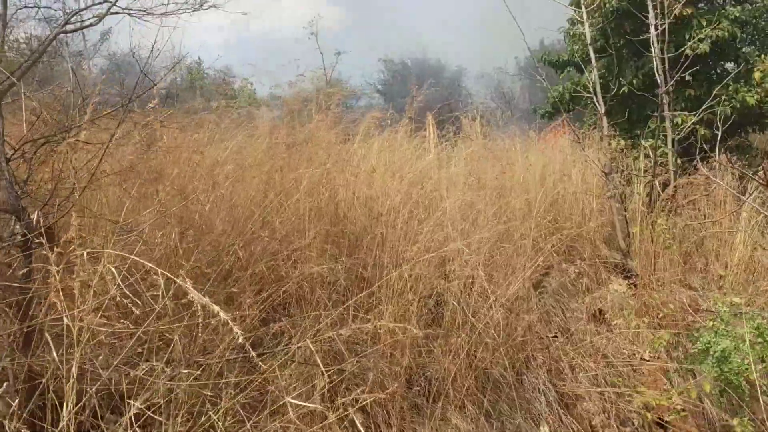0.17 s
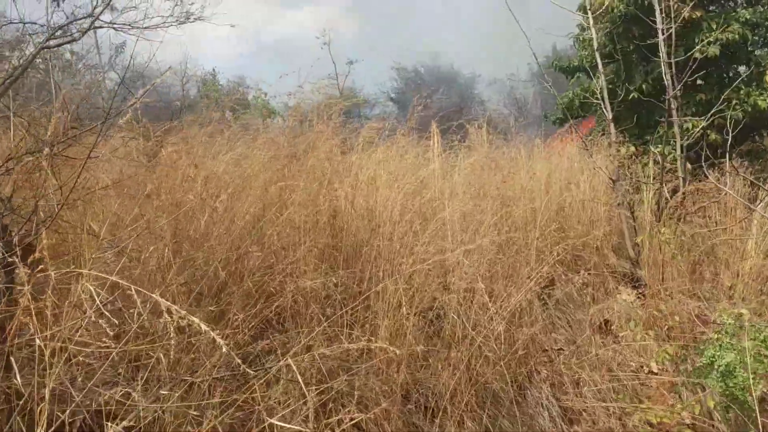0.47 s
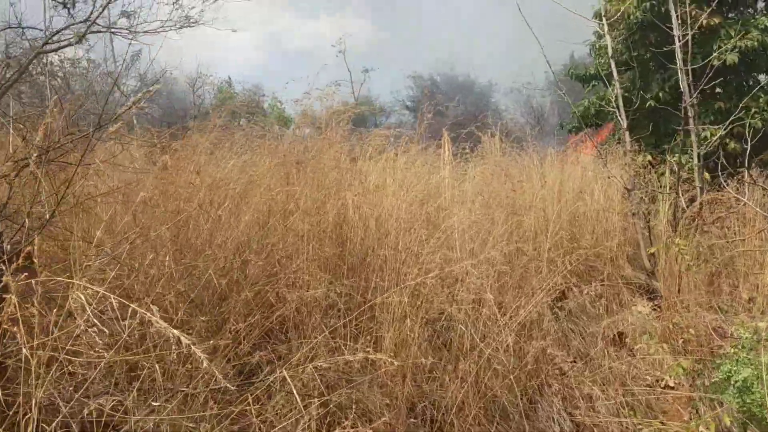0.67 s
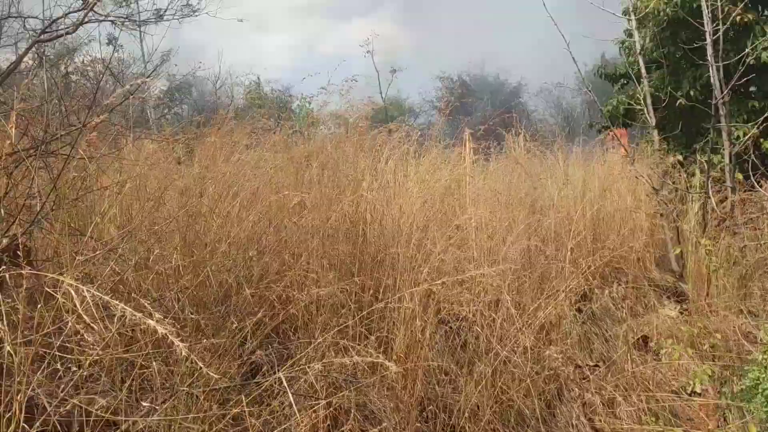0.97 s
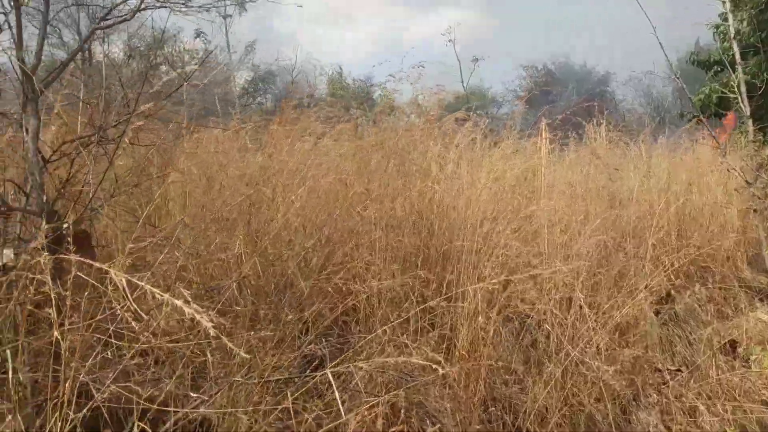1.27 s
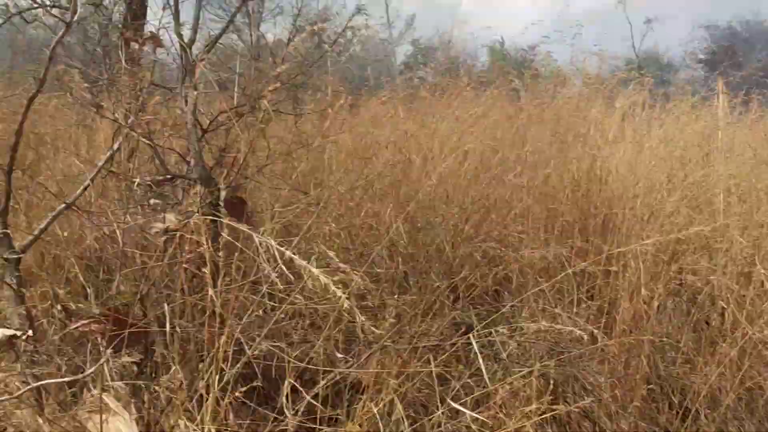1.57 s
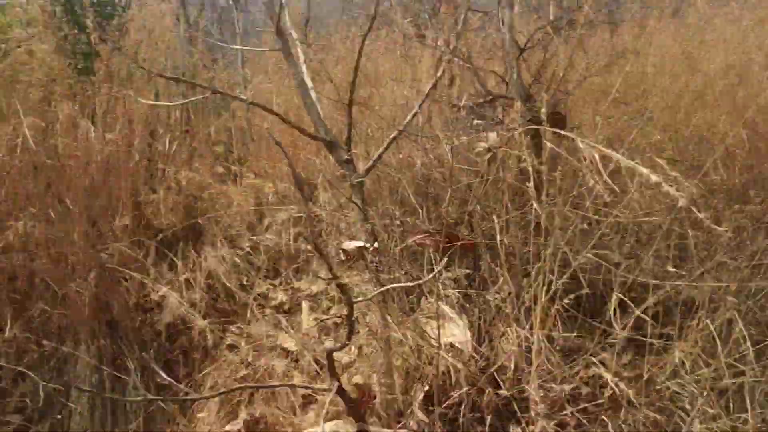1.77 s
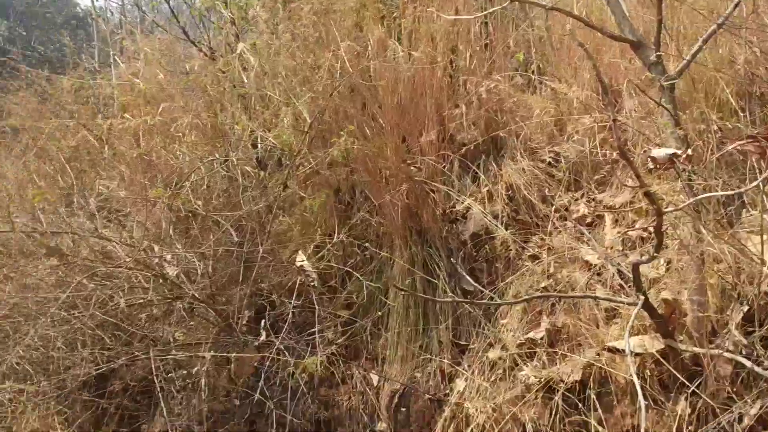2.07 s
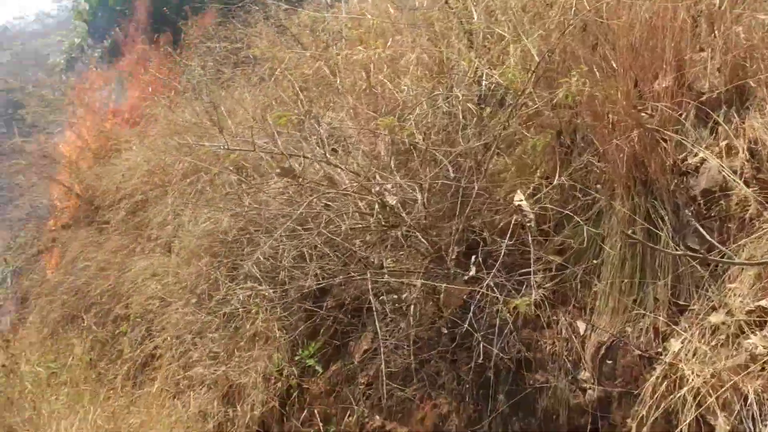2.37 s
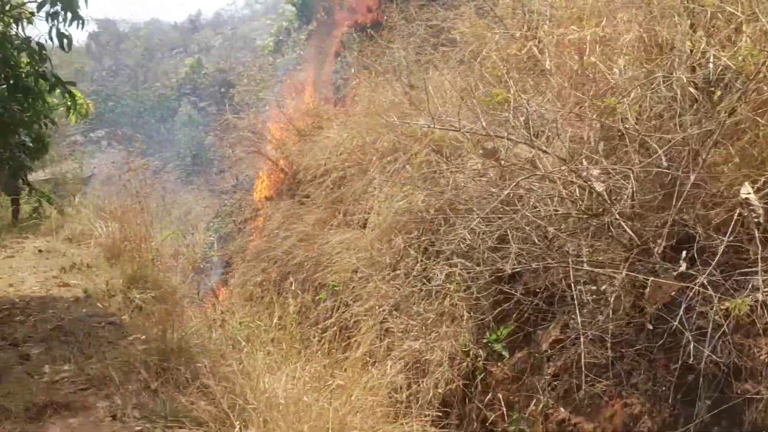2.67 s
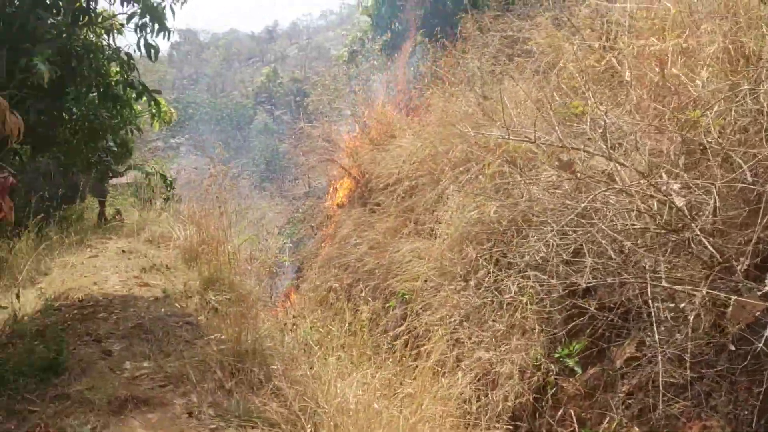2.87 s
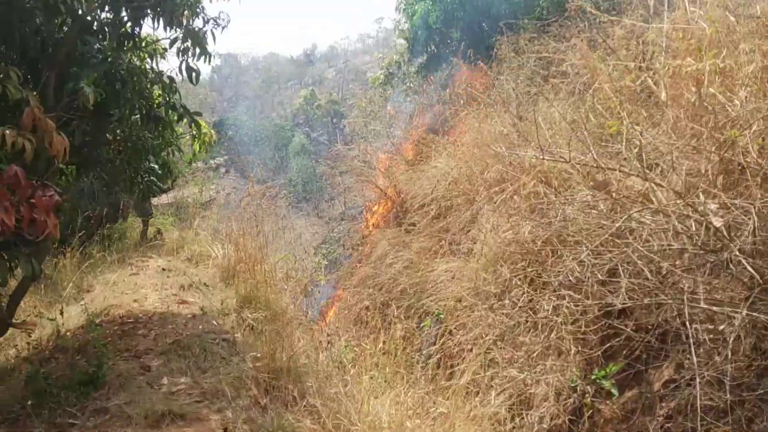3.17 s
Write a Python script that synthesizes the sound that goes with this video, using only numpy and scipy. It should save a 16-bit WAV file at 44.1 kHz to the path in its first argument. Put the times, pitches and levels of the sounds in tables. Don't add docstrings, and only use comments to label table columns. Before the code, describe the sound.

A grass fire on open land crackles continuously from start to finish, bright dry snaps crowding over a hissing, rushing bed. Wind thumps the left at 0.1-0.25 and 0.8-1.0 seconds. Snapping is busiest until 1.4; a gust slaps the right near 1.7 as the handheld stereo microphone turns. Heavy right-side buffeting comes at 2.3-2.5, the fire centres by 2.8, and duller pops and snaps continue to 3.3.

```python
import sys
import numpy as np
from scipy import signal
from scipy.fft import rfft, irfft
from scipy.io import wavfile
from scipy.ndimage import uniform_filter1d, minimum_filter1d

SR = 44100
rng = np.random.default_rng(int(sys.argv[2]) if len(sys.argv) > 2 else 0)


def field_ratio(decibels):
    return 10 ** (np.asarray(decibels, dtype=float) / 20)


def transcribe(signal):
    frames = np.atleast_2d(signal).T
    limited = np.clip(frames, -1, 1)
    pcm = np.round(limited * 32767).astype(np.int16)
    wavfile.write(sys.argv[1], SR, pcm)


N = 146853

# t/s, level/dB
BLAZE = [(0, -33), (.2, -32), (.26, -26), (.31, -30.5), (.5, -27.5), (.63, -31), (.8, -27), (.97, -29),
         (1.2, -25), (1.35, -29.5), (1.45, -27), (1.6, -30), (1.74, -28.5), (1.97, -28.5), (2.4, -29.5),
         (2.55, -29.5), (3.0, -29), (3.17, -26)]
# f/Hz, level/dB
FIRE_SPECTRUM = [(200, -3), (500, -4), (1700, -3.5), (3100, -2.5), (4400, 0), (7500, -0.5), (12000, 0.5),
                 (15500, -4)]
# t/s, left lag/ms, casing echo delay/ms, echo share left/1, echo share right/1,
# share of the path round the casing/1
TURN = [
    (0, .42, .19, .55, .03, .1),
    (.9, .435, .19, .4, .05, 0),
    (1.1, .46, .185, .33, .03, 0),
    (1.7, .465, .2, .3, .03, 0),
    (2.0, .32, .36, .35, .05, .35),
    (2.35, .175, .34, .35, .08, .55),
    (2.5, .14, .33, .3, .08, 0),
    (2.8, 0, .32, .3, .1, 0),
    (3.33, 0, .33, .4, .1, 0),
]
# t/s, peak
# level/dB, f/Hz, length/ms
LOUD_SNAPS = [(0.2091, -7.0, 12100.0, 0.45), (0.2924, -12.0, 6800.0, 0.45), (0.3146, -10.0, 6500.0, 1.35),
              (0.3483, -10.0, 11600.0, 0.45), (0.44, -8.0, 7200.0, 1.15), (0.483, -9.0, 9000.0, 0.85),
              (0.5553, -12.0, 7400.0, 0.95), (0.6616, -8.0, 7300.0, 0.45), (0.6658, -11.0, 6600.0, 0.35),
              (0.7467, -11.0, 2200.0, 0.55), (0.8023, -9.0, 2800.0, 0.65), (0.8445, -8.0, 2800.0, 0.85),
              (0.8993, -12.0, 7900.0, 2.15), (0.9291, -10.0, 6700.0, 0.85), (0.9976, -11.0, 2100.0, 0.65),
              (1.0353, -10.0, 1800.0, 0.35), (1.0579, -9.0, 8100.0, 0.55), (1.0769, -10.0, 2900.0, 0.75),
              (1.1625, -9.0, 8400.0, 0.25), (1.177, -12.0, 3400.0, 0.45), (1.1927, -12.0, 8300.0, 0.35),
              (1.2134, -10.0, 1600.0, 0.75), (1.23, -12.0, 7900.0, 0.75), (1.3124, -11.0, 8200.0, 0.35),
              (1.4117, -11.0, 2700.0, 0.55),
              (1.7116, -10.0, 2600.0, 0.35), (1.7366, -11.0, 9200.0, 1.05), (1.7917, -13.0, 10200.0, 0.55),
               (2.0315, -12.0, 11400.0, 0.55), (2.0937, -8.0, 10700.0, 0.65), (2.204, -14.0, 7500.0, 1.75),
               (2.2079, -9.0, 10300.0, 0.65), (2.2217, -10.0, 7700.0, 0.75), (2.3852, -11.0, 9900.0, 1.05),
               (2.4117, -13.5, 6600.0, 1.25), (2.4216, -9.0, 10200.0, 1.25), (2.4532, -11.0, 7700.0, 0.45),
               (2.4686, -9.0, 7400.0, 0.55), (2.5517, -12.0, 13600.0, 0.55), (2.5765, -13.0, 11100.0, 0.45),
               (2.6546, -9.0, 10300.0, 0.45), (2.7241, -13.0, 10200.0, 0.75),
               (2.8126, -11.0, 10900.0, 0.65), (2.9325, -10.0, 8400.0, 0.55), (2.9711, -10.0, 4100.0, 0.45),
               (3.1315, -9.0, 8700.0, 0.35), (3.1888, -10.0, 10900.0, 0.45), (3.1973, -12.0, 1700.0, 0.75),
               (3.2029, -10.0, 4000.0, 0.55), (3.2368, -9.0, 10600.0, 1.95)]
# t/s, peak level/dB, f/Hz
TICKS = [(0.06, -19, 2800), (0.0657, -20, 7600), (0.098, -17, 6500), (0.1845, -19, 2300),
         (0.2091, -9, 12100), (0.2215, -16, 7300), (0.2356, -17, 9300), (0.2661, -16, 7000),
         (0.4782, -18, 7100), (0.5708, -19, 8100), (0.5883, -17, 6500), (0.5968, -18, 6500),
         (0.6857, -18, 6700), (0.6891, -19, 11500), (0.723, -19, 6700), (0.7353, -17, 2900),
         (0.7624, -18, 5700), (0.8069, -15, 7700), (0.8322, -18, 11300), (0.8575, -17, 15200),
         (0.8672, -17, 15200), (0.9036, -18, 9300), (0.9106, -18, 11700), (1.0514, -18, 1700),
         (1.0835, -15, 6700), (1.1578, -17, 8800), (1.1733, -15, 7100), (1.2006, -15, 8500),
         (1.2184, -16, 7300), (1.227, -16, 13400), (1.2823, -16, 12300), (1.2901, -16, 9600),
         (1.3426, -19, 8300), (1.3495, -19, 9700), (1.4542, -14, 6400), (1.4875, -16, 1700),
         (1.5725, -17, 7100), (1.5822, -16, 9300), (1.609, -18, 2600), (1.6332, -16, 1400),
         (1.6543, -18, 1700), (1.6702, -17, 12800), (1.7178, -17, 5300), (1.7309, -18, 10200),
         (1.8604, -20, 10800), (1.9059, -17, 10300), (2.0972, -18, 6800), (2.3079, -18, 10900),
         (2.3498, -19, 4300), (2.5415, -19, 9800), (2.6179, -19, 10900), (2.7165, -19, 10000),
         (2.8235, -17, 11200), (2.8483, -18, 8100), (3.1175, -18, 1700), (3.3054, -17, 10200)]
# t/s, peak level/dB, f/Hz
POPS = [
    (0.4264, -11, 1200),
    (0.4733, -14, 1460),
    (2.365, -17.5, 795),
    (2.912, -25, 1990),
    (2.9393, -20, 1700),
    (2.959, -17.5, 1700),
    (2.9714, -15, 1120),
    (3.161, -22, 1840),
    (3.314, -13, 655),
]
# t/s, left level/dB, right level/dB
BREEZE = [(0, -21.5, -29), (.3, -29, -45), (.75, -29.5, -30), (1.05, -25, -35.5), (1.35, -30.5, -30),
          (1.7, -37, -24.5), (1.9, -32.5, -31.5), (2.15, -32, -32), (2.3, -20.5, -23), (2.6, -24, -25),
          (2.8, -47.5, -24.5), (3.05, -30.5, -27), (3.33, -35.5, -37.5)]
# f/Hz, level per Hz/dB
WIND_SPECTRUM = [(15, -2.5), (40, 4.5), (70, -3), (130, -7.5), (250, -20.5), (500, -47.5), (1000, -26)]
# t/s, peak level/dB, width/ms
EDDIES_LEFT = [(0.065, -12, 11.5), (0.078, -12, 11), (0.098, -15.5, 3.3), (0.12, -12.5, 9.7),
               (0.139, -7.5, 2.6), (0.162, -3.5, 2.93), (0.185, -10.5, 14), (0.208, -11, 5),
               (0.232, -13.5, 2.9), (0.253, -3.5, 5.2), (0.826, -15.5, 6.6), (0.881, -7, 4.5),
               (0.9, -5, 4.4), (0.933, -3.5, 6.6), (0.967, -9, 4.8), (2.332, -13, 2.4), (2.351, -30, 5.5),
               (2.421, -15, 1.57)]
# t/s, peak level/dB, width/ms
EDDIES_RIGHT = [(1.467, -10, 2.5), (1.56, -22.5, 65), (1.751, -15, 3.7), (2.301, -3.5, 9.3),
                (2.311, -3.5, 2.3), (2.334, -6, 2.2), (2.35, -4.5, 3.5), (2.445, -6.5, 7), (2.488, -6, 2.8),
                (2.502, -5, 2.2), (2.511, -8.5, 3.4), (2.542, -11, 4.4), (2.712, -16, 9.5),
                (2.767, -11.5, 7.5), (2.879, -15.5, 1.6), (2.91, -9, 5.9)]
# t/s, level/dB, recovery/ms
SLAPS = [
    (1.6763, -2.5, 4.1),
    (2.955, -8, 7.4),
]

SNAP_DB, SNAP_RING, SNAP_Q = 3.0, .35, 3.5
SNAP_TAIL_DB, SNAP_TAIL_S = -17, .008
POP_HZ, POP_RING = 3000, .65
TICK_MS, TICK_DB = .5, 2.5
CRACKLE_PER_S, CRACKLE_SPREAD_DB, CRACKLE_CAP, CRACKLE_DB = 910, 3, 3.1, 2
CLUMP_DB = 3.0
GRAIN_MS, GRAIN_SPREAD = .25, 4.0
RUSH_DB, RUSH_PATCH_DB = -1, 1.5
DIFFUSE_DB, DIFFUSE_LOW_DB, DIFFUSE_FROM_HZ, DIFFUSE_GRAIN = 8, -4.5, 4200, 0.81
ROAR_HZ, ROAR_DB, ROAR_DB_PER_MS = 1410, -5, 11
FRONT_MS, ROUND_MS = .028, .26
LUMPY_DB = 2.0
SUCK_LEFT, SUCK_RIGHT, SETTLE = 0.64, 0.085, 0.19
SLAP_RISE_MS, SLAP_EDGE_MS = 4.3, 0.73
LIMIT_DB, LIMIT_SHARE, RECOVER_DB_PER_S = -9, .7, 400
GATE_DB, GATE_DEPTH_DB, GATE_FROM_HZ = -3.3, -40, 2300
EDGE_HZ = 15800


def evened(x):
    return x / np.sqrt(np.mean(x ** 2) + 1e-20)


def read(points, hz):
    f, value = np.transpose(points)
    return np.interp(np.log(hz + 1), np.log(f + 1), value)


def curve(rows, t):
    columns = np.transpose(rows)
    return np.array([np.interp(t, columns[0], c) for c in columns[1:]])


def drift(rate, shape):
    z = rfft(rng.standard_normal(shape))
    return evened(irfft(z / (1 + (np.fft.rfftfreq(N, 1 / SR) / rate) ** 2), N))


def burst(hz, ms, noise):
    t = np.arange(len(noise)) / SR
    r = np.exp(-np.pi * hz / SNAP_Q / SR)
    hz = min(hz, 16000)
    ring = signal.lfilter([1, 0, -1], [1, -2 * r * np.cos(2 * np.pi * hz / SR), r * r], noise)
    u = t * 1000 / ms - 1
    shape = np.exp(-np.where(u < 0, 3 * u ** 2, 1.5 * u))
    shape = shape + (u > 0) * field_ratio(SNAP_TAIL_DB) * np.exp(-t / SNAP_TAIL_S)
    share = POP_RING if hz < POP_HZ else SNAP_RING
    sound = shape * ((1 - share) * noise + share * evened(ring))
    return sound / np.sqrt(uniform_filter1d(sound ** 2, size=20, mode="constant").max())


def crackle(count=6, size=5):
    clump = field_ratio(CLUMP_DB * drift(13, N))
    hit = rng.random(N) < clump / clump.mean() * CRACKLE_PER_S / SR
    big = np.minimum(rng.exponential(1, N), CRACKLE_CAP)
    train = hit * field_ratio(CRACKLE_SPREAD_DB * big)
    kind = rng.integers(0, count * size, N)
    draw = rng.random((count * size, 2))
    noise = rng.standard_normal((count * size, 1024))
    out = np.zeros((count, N))
    for k in range(count * size):
        grain = burst(900 * 15 ** draw[k, 0], GRAIN_MS * GRAIN_SPREAD ** draw[k, 1], noise[k])
        out[k % count] += signal.oaconvolve(train * (kind == k), grain)[:N]
    return out / np.sqrt(np.mean(out.sum(0) ** 2))


def ports(places, gains):
    hz, t, z = signal.stft(places, SR, nperseg=256, noverlap=192)
    lag, echo, left, right, around = curve(TURN, t)
    spread = FRONT_MS * np.linspace(-1, 1, len(places))[:, None, None]

    def late(ms):
        return np.exp(-2j * np.pi * hz[:, None] * ms / 1000)

    z = z * gains(hz, t)
    at_left = (z * late(lag + spread)).sum(0) * (1 - left * late(echo) + around * late(ROUND_MS))
    at_right = z.sum(0) * (1 - right * late(echo))
    return signal.istft(np.array([at_left, at_right]), SR, nperseg=256, noverlap=192)[1][:, :N]


def colour(hz, t):
    level = curve(BLAZE, t)[0]
    roar = ROAR_DB + ROAR_DB_PER_MS * curve(TURN, t)[0]
    return field_ratio(read(FIRE_SPECTRUM, hz)[:, None] + level + roar / (1 + (hz[:, None] / ROAR_HZ) ** 2))


def scatter_colour(hz, t):
    low = DIFFUSE_LOW_DB / (1 + (hz[:, None] / DIFFUSE_FROM_HZ) ** 4)
    return colour(hz, t) * field_ratio(DIFFUSE_DB + low)


def fire():
    places = crackle()
    rush = rng.standard_normal(places.shape) / np.sqrt(len(places))
    rush = rush * field_ratio(RUSH_PATCH_DB * drift(23, N))
    front = ports(field_ratio(CRACKLE_DB) * places + field_ratio(RUSH_DB) * rush, colour)
    grain = np.sqrt(abs(uniform_filter1d((places ** 2).sum(0), size=90)))
    scatter = rng.standard_normal((2, 1, N)) * (1 - DIFFUSE_GRAIN + DIFFUSE_GRAIN * grain)
    return front + [ports(scatter[0], scatter_colour)[0], ports(scatter[1], scatter_colour)[1]]


def snap_colour(hz, t):
    return field_ratio(read(FIRE_SPECTRUM, hz))[:, None]


def snaps(count=3):
    small = [(s, db + TICK_DB, hz, TICK_MS) for s, db, hz in TICKS + POPS]
    rows = LOUD_SNAPS + small
    noise = rng.standard_normal((len(rows), 1024))
    out = np.zeros((count, N))
    for k, (s, db, hz, ms) in enumerate(rows):
        part = out[k % count, round((s - ms / 1000) * SR):][:1024]
        part += field_ratio(db + SNAP_DB) * burst(hz, ms, noise[k])[:len(part)]
    return ports(out, snap_colour)


def wind():
    hz, t = np.fft.rfftfreq(N, 1 / SR), np.arange(N) / SR
    flow = evened(irfft(rfft(rng.standard_normal((2, N))) * field_ratio(read(WIND_SPECTRUM, hz)), N))
    out = flow * field_ratio(curve(BREEZE, t) + LUMPY_DB * drift(24, (2, N)))
    for port, (rows, suck) in enumerate([(EDDIES_LEFT, SUCK_LEFT), (EDDIES_RIGHT, SUCK_RIGHT)]):
        for s, db, ms in rows:
            u = (t - s) / (ms / 1700)
            before = suck * np.exp(-(u + 2.15) ** 2 / 0.47)
            after = SETTLE * np.exp(-(u - 2.6) ** 2 / 3)
            out[port] += field_ratio(db) * (np.exp(-u ** 2) - before - after)
    for s, db, ms in SLAPS:
        u = (t - s) * 1000
        fade = np.exp(-abs(u) / np.where(u < 0, SLAP_RISE_MS, ms))
        out[1] -= field_ratio(db) * np.tanh(u / SLAP_EDGE_MS) * fade
    return out


def scene():
    return fire() + snaps() + wind()


def limiter(x):
    power_db = 10 * np.log10(abs(uniform_filter1d((x ** 2).max(0), 60)) + 1e-12)
    fall = np.arange(N) * RECOVER_DB_PER_S / SR
    over_db = np.maximum(np.maximum.accumulate(power_db + fall) - fall - LIMIT_DB, 0)
    return np.clip(x / field_ratio(LIMIT_SHARE * uniform_filter1d(over_db, 60)), -1, 1)


def gate(x):
    hz, t, z = signal.stft([x[0] + x[1], x[0] - x[1]], SR, nperseg=2048, noverlap=1024)
    power = abs(z) ** 2
    high = hz[:, None] > GATE_FROM_HZ / 2
    around = uniform_filter1d(power.mean(0) * high, size=140, axis=0)
    patch = uniform_filter1d(uniform_filter1d(power, size=8, axis=1), size=2, axis=2)
    lowest = minimum_filter1d(patch, size=2, axis=2, origin=-1)
    weak = (lowest < around * field_ratio(2 * GATE_DB)) & (hz[:, None] > GATE_FROM_HZ)
    z = z * np.where(weak, field_ratio(GATE_DEPTH_DB), 1)
    mid, side = signal.istft(z, SR, nperseg=2048, noverlap=1024)[1][:, :N]
    return np.array([mid + side, mid - side]) / 2


def band_limit(x):
    return signal.sosfilt(signal.butter(12, 17030, fs=SR, output="sos"), x)


def record(dry):
    low_pass = signal.firwin(511, EDGE_HZ, window=("kaiser", 7), fs=SR)
    mix = signal.oaconvolve(gate(limiter(dry)), low_pass[None], "same")
    return band_limit(mix)


dry = scene()
out = record(dry)
transcribe(out)
```